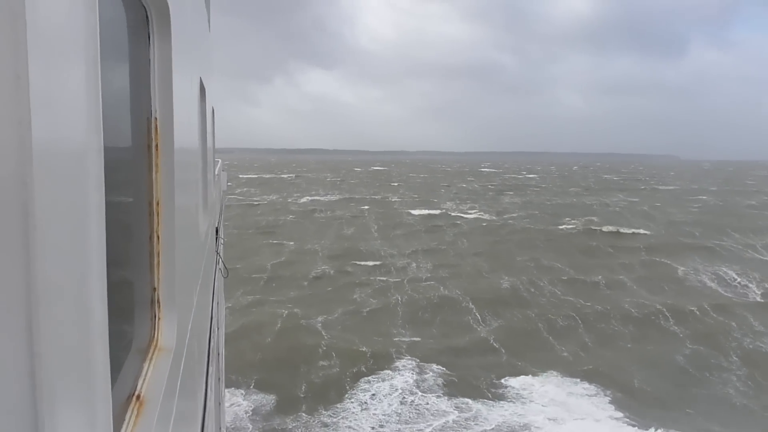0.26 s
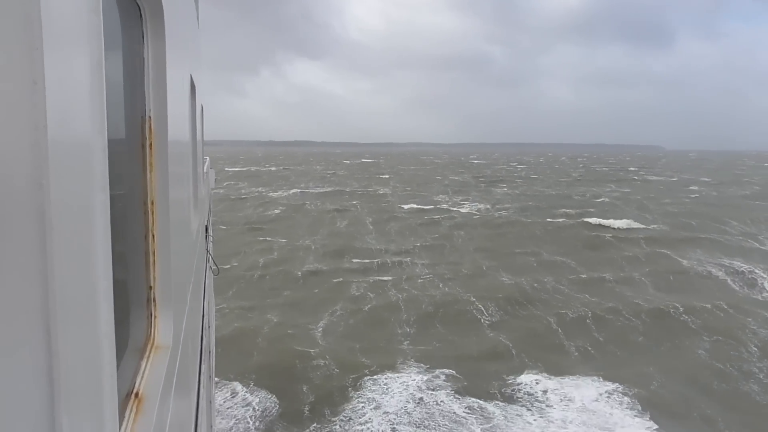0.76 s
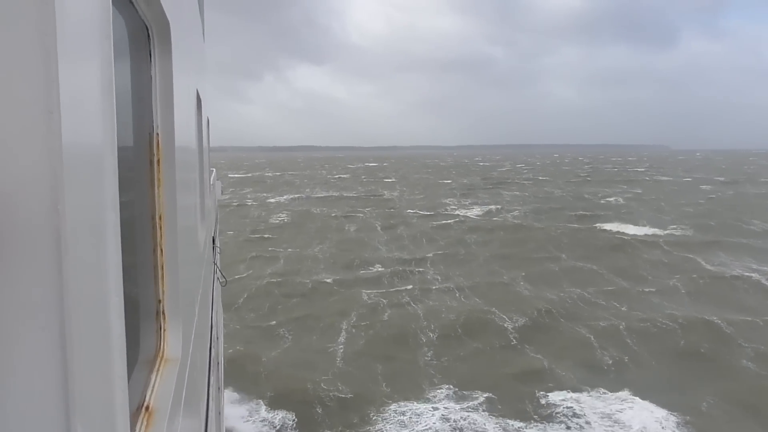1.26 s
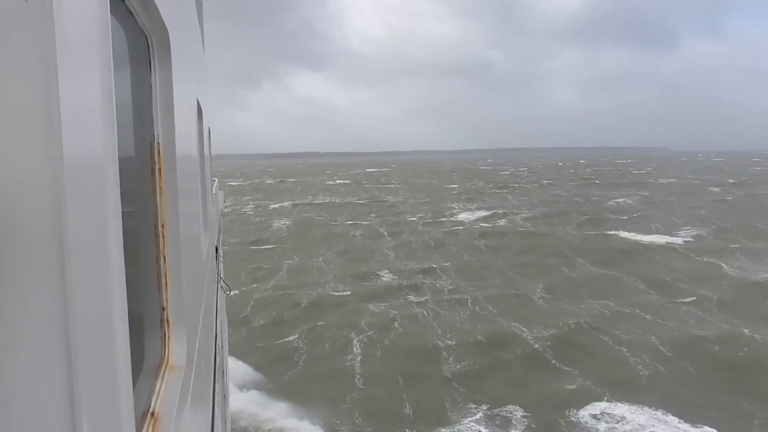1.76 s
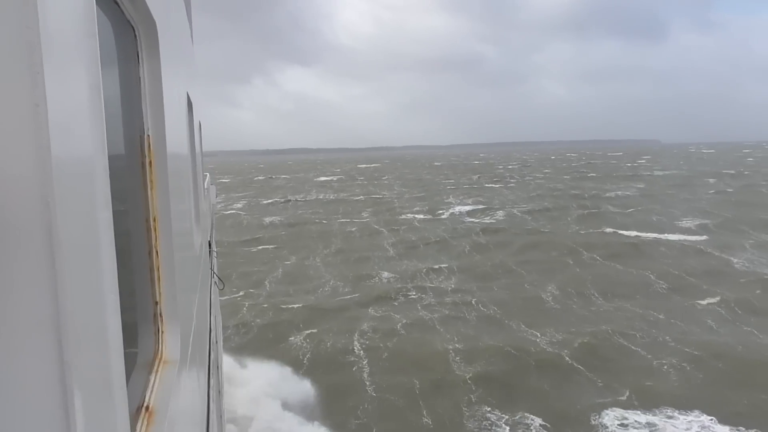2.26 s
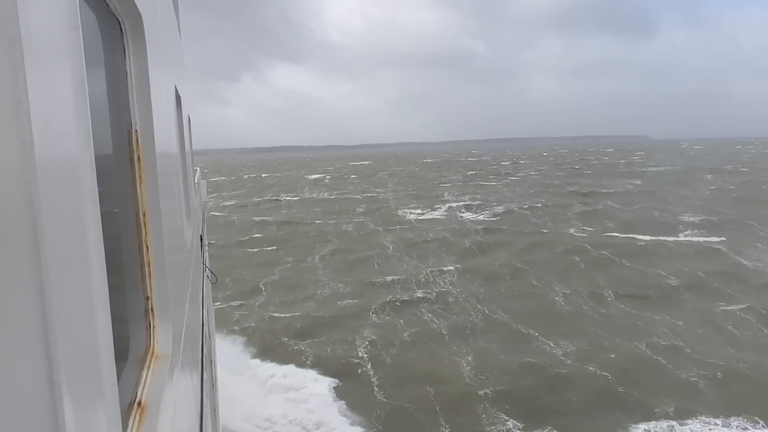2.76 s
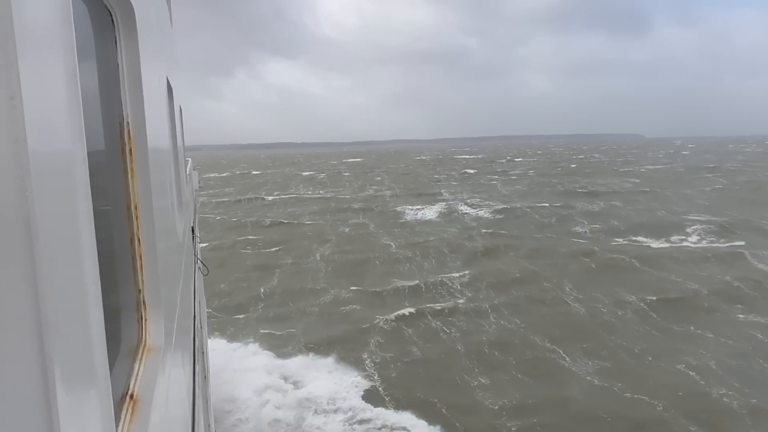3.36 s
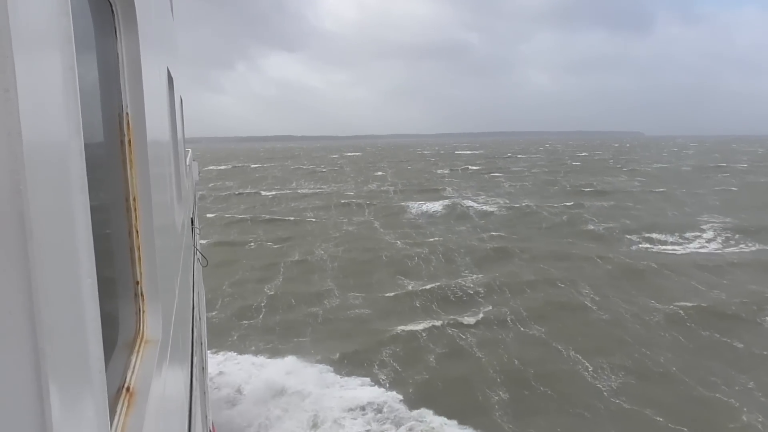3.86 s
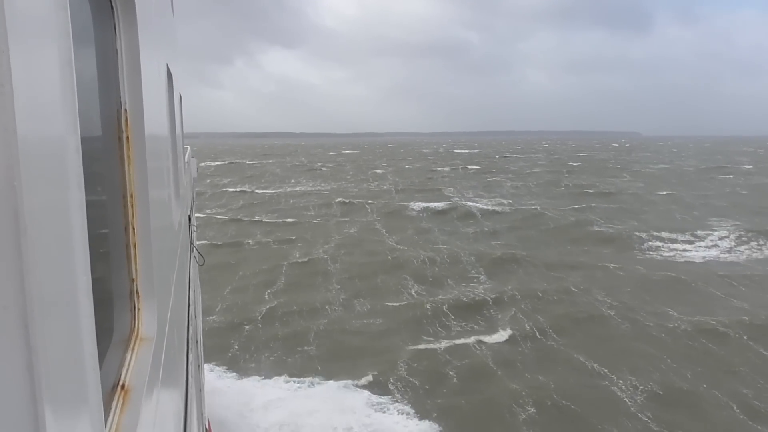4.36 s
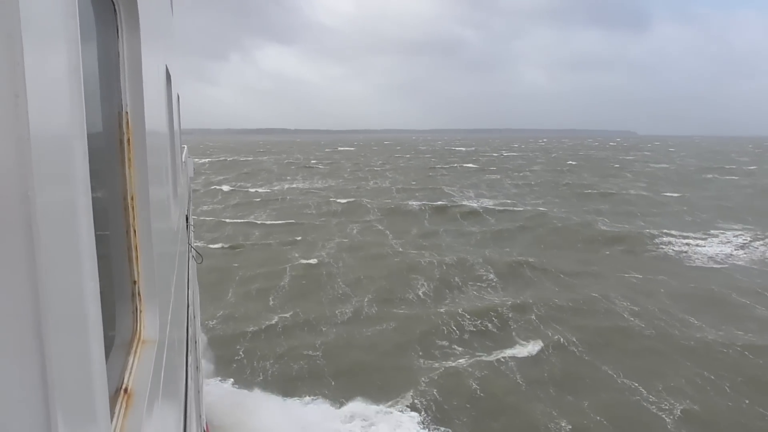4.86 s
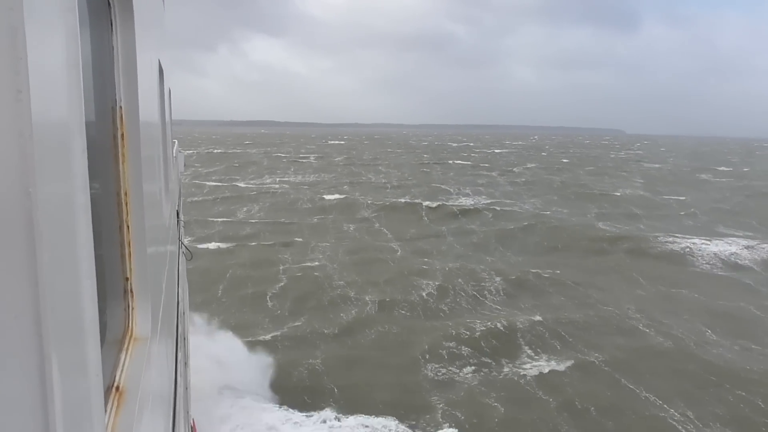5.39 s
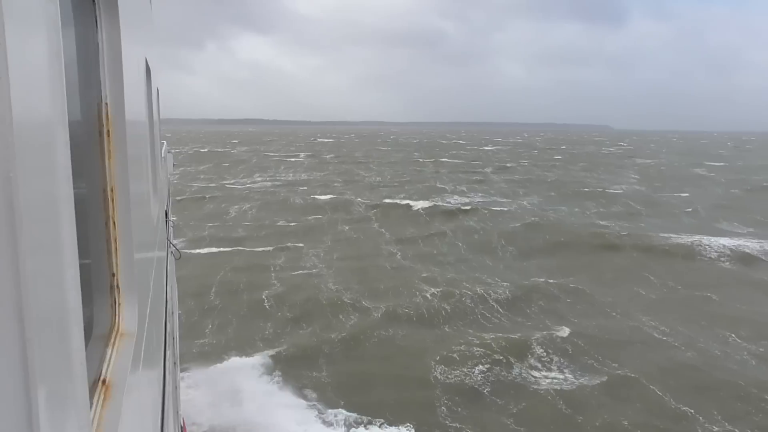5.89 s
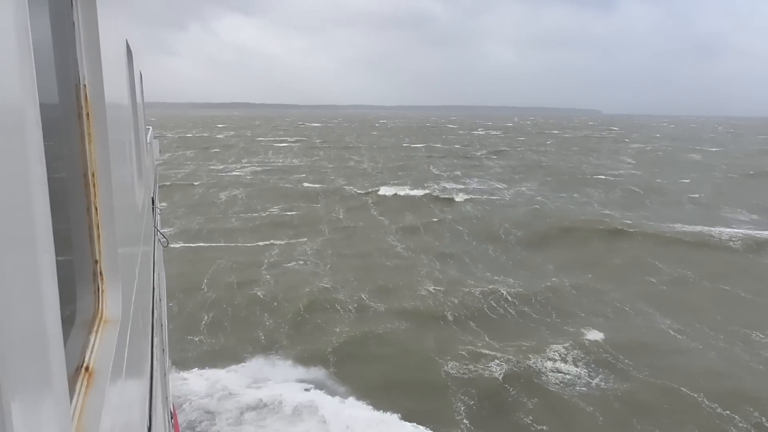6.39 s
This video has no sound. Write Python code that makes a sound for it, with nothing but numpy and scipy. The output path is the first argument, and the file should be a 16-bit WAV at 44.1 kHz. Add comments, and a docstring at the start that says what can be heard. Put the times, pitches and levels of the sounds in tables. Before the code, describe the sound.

A gale blows straight across an unprotected microphone on a ferry's open deck for about six and a half seconds. It starts abruptly at full strength, a low, rumbling buffet with rough flutter and a much quieter ragged hiss, crackling with tiny ticks. From 0.7 to 1.9 s hard gusts strike in quick succession, each a short dull thump with a noisy slap. The wind sags near 1.5 and 2.3 s, surges around 2.5 and 2.9 s, and thumps again at 3.0 s. After easing toward 3.8 s, the heaviest blow lands just after 4.0 s. More hits come at 4.9 s and 5.4 to 5.7 s, then a strong swell near 6.1 s, and the wind is still blowing at the end. Sharp little spits of air appear occasionally. Far beneath, the bow wave washes steadily along the hull in slow, faint surges, mostly masked. The sound is nearly mono.

```python
"""A gale on the open deck of a ferry blows straight across a microphone port: big eddies buffet it,
smaller ones flutter, and the smallest tear at its edge with a ragged, ticking hiss. All are shaped noise.
Single hard eddies hit the port with a decaying low thump and a slap of noise; sharp puffs spit at its edge.
Far beneath the wind, the bow wave washes along the hull as slowly surging noise. The sound is almost mono."""
import sys
import numpy as np
from scipy.fft import rfft, irfft, next_fast_len
from scipy.io import wavfile
from scipy.ndimage import uniform_filter1d, minimum_filter1d, map_coordinates

SR = 44100
rng = np.random.default_rng(int(sys.argv[2]) if len(sys.argv) > 2 else 0)


def generate_wav(sig):
    """Save sig (samples, or channels by samples) to the path in sys.argv[1] as 16-bit PCM at SR."""
    pcm = np.round(np.clip(np.atleast_2d(sig).T, -1, 1) * 32767).astype(np.int16)
    wavfile.write(sys.argv[1], SR, pcm)


N = 292383

# Single hard eddies that hit the port.
# Each row: start in seconds, relative level of the low thump in dB, relative level of the slap in dB.
HARD_EDDIES = [(0.669, -4, -16), (0.824, 2, -13), (0.984, -7, -19), (1.169, 1, -13), (1.239, 0.5, -22),
               (1.628, -2.5, -18), (1.701, 3, -17), (1.849, -3, -20), (1.887, 0.5, -15), (2.518, -6, -10.5),
               (3.029, 2, -14.5), (3.395, -10, -13), (3.98, -1, -11.5), (4.067, 8, -15), (4.317, -4, -18),
               (4.932, 0, -11), (5.392, -1, -23), (5.624, -1.5, -18), (5.699, -2, -14)]
# Colour of the mid-sized eddies and of the slaps. Each row: frequency in Hz, relative level in dB per Hz.
FLUTTER_SPECTRUM = [(80, -29), (220, -9.5), (380, -1.5), (520, -1.5), (720, -4.5), (1000, -8.5),
                    (1300, -13.5), (1520, -18.5), (1750, -29), (2100, -27.5), (2700, -37.5), (5000, -49.5)]
# Colour of the air tearing at the port's edge. Each row: frequency in Hz, relative level in dB per Hz.
EDGE_SPECTRUM = [(600, -41), (1500, 2), (2200, 3), (2900, -1.5), (3700, 1.5), (4800, -1), (6000, -6.5),
                 (7400, -2), (9000, -1), (10800, -3.5), (12500, -9.5), (15400, -31)]


def amp(db):
    """Decibels to gain."""
    return 10 ** (np.asarray(db) / 20)


def unit(x):
    """Scale to rms 1."""
    return x / np.sqrt(np.mean(x ** 2) + 1e-20)


def curves(rows):
    """One value per sample for each column after the time, on straight lines between the rows."""
    seconds, *columns = np.transpose(rows)
    t = np.arange(N) / SR
    return [np.interp(t, seconds, column) for column in columns]


def wobble(rate):
    """A smooth random curve of rms 1, with rate knots a second."""
    knots = rng.standard_normal(N // 8)
    position = np.arange(N) * rate / SR + 2
    return unit(map_coordinates(knots, [position], mode="wrap"))


def filtered(x, response):
    """x times a response of frequency, padded so that its tail does not wrap round."""
    m = next_fast_len(N + SR // 2)
    spectrum = rfft(x, m) * response(np.fft.rfftfreq(m, 1 / SR))
    return irfft(spectrum, m)[..., :N]


def coloured(x, spectrum):
    """x shaped by (Hz, dB) points on a log frequency axis, at rms 1."""
    f, db = np.transpose(spectrum)
    return unit(filtered(x, lambda hz: amp(np.interp(np.log(hz + 1), np.log(f), db))))


def add(track, s, sound):
    """Mix a short sound into a track at s seconds."""
    part = track[max(0, round(s * SR)):][:len(sound)]
    part += sound[:len(part)]


def flow():
    """Wind strength in dB: it swells and sags, swings at random and slackens before each hard eddy."""
    # The wind at the port. Each row: time in seconds, strength in dB.
    strength = [(0, 3), (0.2, -1.5), (0.45, 0.6), (1.35, 0.36), (1.5, -2.5), (1.85, 1.1), (2.14, 0.1),
                (2.26, -3.6), (2.5, 1.7), (2.72, -2.6), (2.88, 2), (2.95, -4), (3.01, 0.0), (3.35, -0.2),
                (3.8, -2.5), (4.12, 2.1), (4.18, -4), (4.28, 0.4), (4.5, -3), (4.88, -1), (4.98, 2.5),
                (5.15, -3.5), (5.22, 0.5), (5.75, 0.5), (6.0, -1.1), (6.08, 3.5), (6.25, 0), (6.4, 2),
                (6.63, -1.3)]
    gustiness_db, gusts_per_s = 0.5, 20  # rms and knot rate of the quick random swings
    slack_db, slack_lead_s, slack_s = 3.5, 0.013, 0.0079  # depth, lead and half length of each slackening
    t = np.arange(N) / SR
    slack = sum(np.exp(-((t - s + slack_lead_s) / slack_s) ** 2) for s, *_ in HARD_EDDIES)
    return curves(strength)[0] + gustiness_db * wobble(gusts_per_s) - slack_db * slack


def stereo_width(flow_db):
    """Faint noise that differs between the ears, unrelated to the rest but as strong as the flow allows."""
    # Colour of the difference. Each row: frequency in Hz, relative level in dB per Hz.
    width_spectrum = [(15, -30), (30, -1), (230, 3), (500, -5), (1140, -4), (2000, -11), (2800, -17),
                      (4000, -15), (6000, -19), (9400, -15.5), (12500, -23), (15000, -33)]
    return amp(flow_db - 53.5) * coloured(rng.standard_normal(N), width_spectrum)


def sea(level_db=-35):
    """Foam washes along the hull: coloured noise in slow surges."""
    # Colour of the bow wave. Each row: frequency in Hz, relative level in dB per Hz.
    wash_spectrum = [(80, -27), (300, 17.5), (1000, 4), (2500, -20.5), (6000, -19), (10000, -20),
                     (15000, -35)]
    surge_db = 0.71 * wobble(1.63)
    return amp(level_db + surge_db) * coloured(rng.standard_normal(N), wash_spectrum)


def bursts(rows, spectrum, t60, gain_db):
    """Eddies that burst on the port: sudden puffs of noise that each fall 60 dB in t60 seconds."""
    track, t = np.zeros(N), np.arange(SR // 8) / SR
    for s, db in rows:
        puff = amp(db + gain_db - 60 * t / t60) * rng.standard_normal(len(t))
        add(track, s, puff)
    return np.std(track) * coloured(track, spectrum)  # colouring leaves the overall level as it was


def spits():
    """Sharp spits of air at the port's edge: very short bursts in the colour of the hiss."""
    # Each row: start in seconds, relative level in dB.
    spit_rows = [(0.2344, -20.5), (1.1697, -23), (1.3917, -15.5), (2.845, -22), (3.3333, -20), (4.09, -27),
                 (5.199, -16), (5.441, -21)]
    return bursts(spit_rows, EDGE_SPECTRUM, t60=0.012, gain_db=-10.5)


def slaps():
    """The noisy part of each hard eddy: a burst in the colour of the flutter."""
    rows = [(s, slap_db) for s, _, slap_db in HARD_EDDIES]
    return bursts(rows, FLUTTER_SPECTRUM, t60=0.082, gain_db=-4.5)


def thumps(port_hz=185, life=0.0067, gain_db=-5):
    """A hard eddy swings the pressure at the port for a couple of cycles; the swell peaks at life / 2 s."""
    track, t = np.zeros(N), np.arange(SR // 10) / SR
    chances = rng.standard_normal((len(HARD_EDDIES), 2))
    for (s, db, _), (detune, phase) in zip(HARD_EDDIES, chances):
        swell = 2 * t / life * np.exp(1 - 2 * t / life)
        hz = port_hz * np.exp(0.16 * detune)
        add(track, s, amp(db + gain_db) * swell * np.sin(2 * np.pi * hz * t + phase))
    return track


def lulls():
    """Brief level changes of buffet and hiss, in dB, while the port lies between two eddies."""
    # Each row: centre in seconds, half length in seconds, change of the buffet in dB, of the hiss in dB.
    lull_rows = [(0.21, 0.027, -7.5, -0.5), (0.534, .02, -2.5, -12), (0.905, 0.064, -3, 0),
                 (1.413, .011, -1, -14), (1.585, 0.02, -6, 0), (2.325, .02, -8, 0), (4.051, 0.01, -8, -4),
                 (4.507, .018, -5, 0), (5.578, 0.024, -5.5, 0.5)]
    t = np.arange(N) / SR
    return sum(np.outer(depths, np.exp(-((t - s) / width) ** 2)) for s, width, *depths in lull_rows)


def crackle(rate=35, spread_db=6.0):
    """Sparse sharp ticks of rms 1, about rate a second, a few much louder than the rest."""
    struck = rng.random(N) < rate / SR
    ticks = struck * amp(spread_db * np.clip(rng.standard_normal(N), -2, 2))
    # high-pass at 1500 Hz, low-pass at 6000 Hz
    return unit(filtered(ticks, lambda hz: 1j * hz / (1500 + 1j * hz) / (1 + 1j * hz / 6000)))


def turbulence(spectrum, bursts_db):
    """Pressure noise that comes in bursts but keeps its strength over the length of a gust."""
    x = coloured(rng.standard_normal(N) * amp(bursts_db), spectrum)
    power = uniform_filter1d(uniform_filter1d(x ** 2, size=SR // 11), size=SR // 20)
    return x / np.sqrt(np.abs(power) + 1e-9)


def wind(flow_db, split_hz=5800):
    """Eddies nest inside eddies: the higher the band, the more it follows the small quick ones."""
    # Colour of the big eddies. Each row: frequency in Hz, relative level in dB per Hz.
    buffet_spectrum = [(10, -42), (25, -29), (40, -19), (62, -8.5), (100, -3.5), (140, 0), (200, -.5),
                       (290, -3.5), (400, -9), (600, -18.5), (1200, -39), (2500, -110)]
    # Slow drift in the level of the hiss. Each row: time in seconds, level in dB.
    treble_drift = [(0, 0.4), (0.95, 0.7), (1.5, -0.6), (2.5, 0.0), (3.6, 0.1), (4.6, -1.0), (5.05, 0.1),
                    (5.6, 0.1), (6.63, 0.5)]
    # each layer: base level in dB + growth in dB per dB of wind strength
    buffet_lull, hiss_lull = lulls()
    buffet_db = -13 + 0.64 * flow_db + buffet_lull + 1.07 * wobble(18)
    flutter_db = -24 + 1.28 * flow_db + 1.13 * wobble(30)
    hiss_db = -43 + 1.36 * flow_db + hiss_lull + curves(treble_drift)[0]

    # eddies of three sizes, shared by the layers
    large, medium, small = wobble(60), wobble(140), wobble(650)
    buffet = amp(buffet_db) * turbulence(buffet_spectrum, 0.73 * large + 1.3 * medium)
    fluttering_db = 1.63 * large + 2.25 * medium + 2.0 * small
    flutter = amp(flutter_db) * turbulence(FLUTTER_SPECTRUM, fluttering_db)
    tearing_db = 0.7 * large + 1.53 * medium + 1.44 * small + 0.77 * wobble(70) + 2.8 * wobble(2400)
    hiss = amp(hiss_db) * turbulence(EDGE_SPECTRUM, tearing_db)

    # as the flow veers, the hiss flickers between dull and bright
    dull = filtered(hiss, lambda hz: 1 / (1 + (hz / split_hz) ** 6))
    bright = hiss - dull
    dull_flicker_db = 1.8 * wobble(220)
    bright_flicker_db = 2.1 * wobble(25) + 1.1 * wobble(500)
    hiss = dull * amp(dull_flicker_db) + bright * amp(bright_flicker_db)
    ticks = amp(hiss_db - 12.0) * crackle()
    return buffet + flutter + hiss + ticks


def scene():
    """Wind and sea arrive alike in both ears; a faint unrelated part adds a little width."""
    flow_db = flow()
    mid = sea() + spits() + slaps() + thumps() + wind(flow_db)
    side = stereo_width(flow_db)
    return np.array([mid + side, mid - side])


def record(dry):
    """A limiter turns both channels down together around high peaks; a steep cut then ends the treble."""
    ceiling, top_hz = 0.97, 15450  # full scale is 1
    needed = ceiling / np.maximum(np.abs(dry).max(axis=0), ceiling)
    held = minimum_filter1d(needed, size=SR // 150)
    gain = uniform_filter1d(held, size=SR // 150)
    return filtered(dry * gain, lambda hz: hz < top_hz)


dry = scene()
out = record(dry)
generate_wav(out)
```